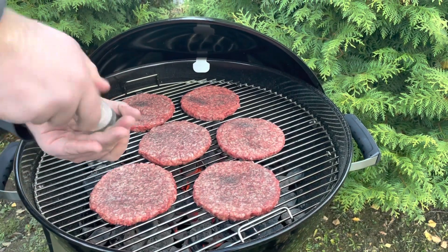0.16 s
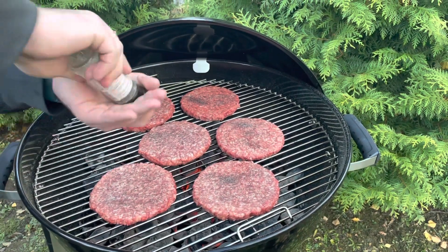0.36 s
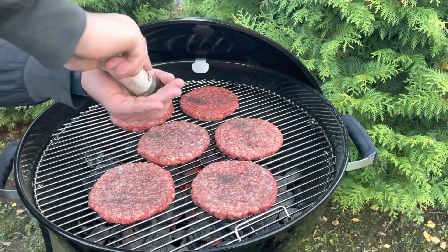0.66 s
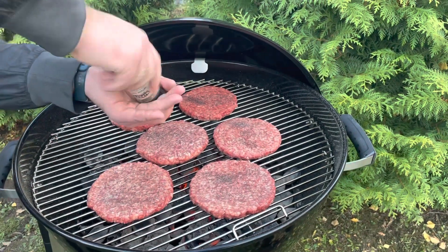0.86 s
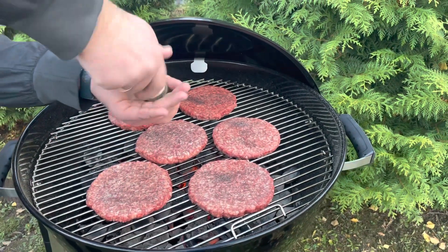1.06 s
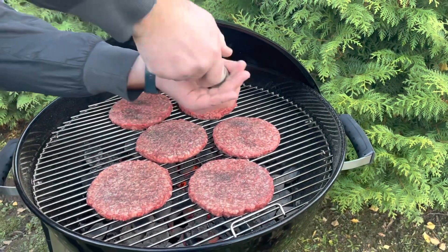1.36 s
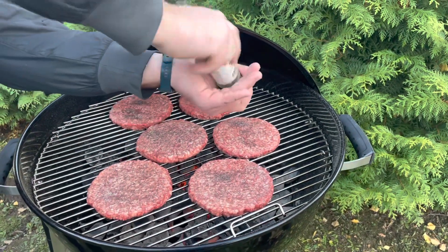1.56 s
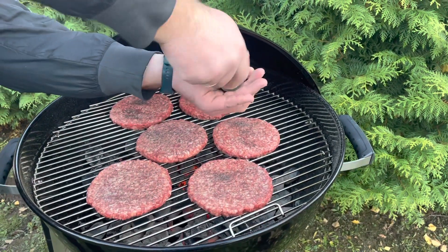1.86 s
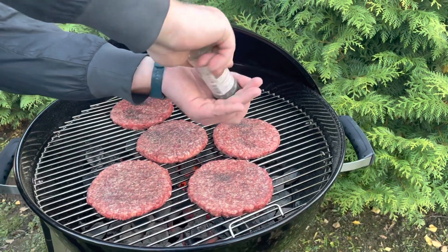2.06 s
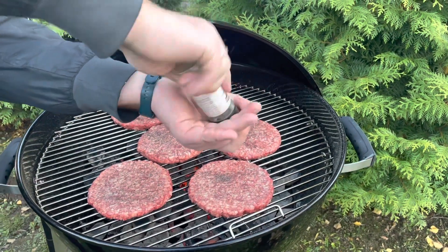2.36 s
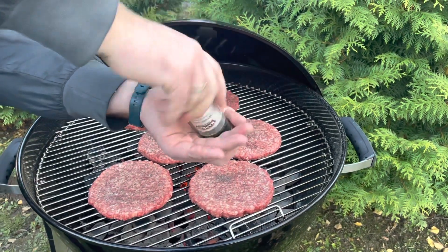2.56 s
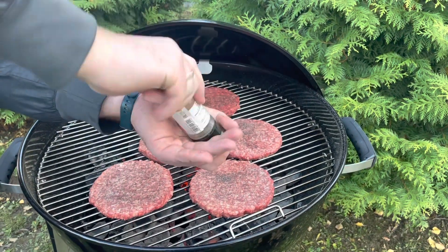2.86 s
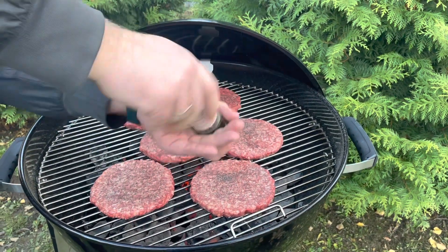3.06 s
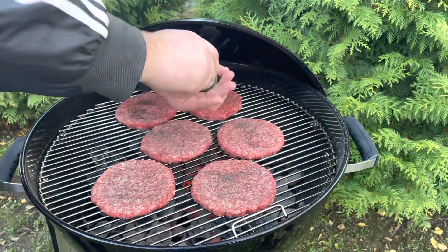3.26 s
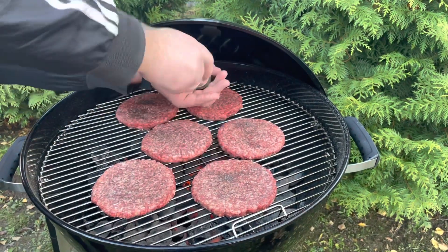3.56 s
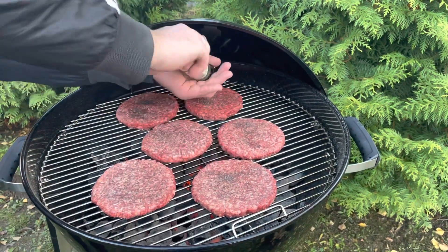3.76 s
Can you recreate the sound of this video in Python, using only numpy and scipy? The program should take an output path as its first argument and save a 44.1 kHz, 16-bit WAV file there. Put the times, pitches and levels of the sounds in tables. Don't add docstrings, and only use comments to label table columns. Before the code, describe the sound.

A hand pepper mill grinds very close, in fourteen short crunchy twists starting near 0.1 s and recurring roughly every 0.3 s until 3.9 s. Each lasts about a tenth of a second, with bright snapping cracks and small hollow jar ringing; strokes around 1.3-1.8 s are somewhat softer. Sparse ticks fill the gaps. Faint grill sizzle and low distant traffic continue outdoors; the stereo phone clips on the loudest cracks.

```python
import sys
import numpy as np
from scipy import signal
from scipy.fft import rfft, irfft
from scipy.io import wavfile
from scipy.ndimage import uniform_filter1d

SR = 44100
rng = np.random.default_rng(int(sys.argv[2]) if len(sys.argv) > 2 else 0)


def ratio(d):
    e = np.asarray(d, float) / 20
    return 10 ** e


def waveform_to_disk(signal):
    frames = np.transpose(np.atleast_2d(signal))
    scaled = np.clip(frames, -1, 1) * 32767
    samples = np.round(scaled).astype(np.int16)
    wavfile.write(sys.argv[1], SR, samples)


N = 171990
HZ = np.fft.rfftfreq(N, 1 / SR) + 1e-3

# frequency in Hz, level in dB.
TRAFFIC_COLOUR = [(36, -22), (52, 8), (80, -5.5), (150, -11), (300, -18.5), (1000, -18), (3000, -13.5),
                  (7000, -36)]
# frequency in Hz, level in dB.
SIZZLE_COLOUR = [(300, -52), (800, -16), (1600, -5), (3500, -7.5), (6000, -6.5), (8500, 1), (13500, 1),
                 (15500, -7.5)]
# start in seconds, length in seconds, crunch level in dB,
# treble over bass in dB, thud in the hand in dB.
TWISTS = [(0.105, 0.074, -13.5, -2, -17), (0.418, 0.084, -11, -9, -15.5), (0.698, 0.083, -9.5, -4, -21),
          (0.953, 0.097, -11.5, -4.5, -18), (1.274, 0.11, -19, -10.5, -16.5), (1.557, 0.1, -16.5, -7, -19),
          (1.804, 0.11, -16, -11, -19), (2.105, 0.11, -12, -7.5, -17), (2.388, 0.09, -12, -12, -25),
          (2.657, 0.065, -12, -12.5, -24.5), (2.896, 0.1, -14, -1.5, -25),
          (3.229, 0.13, -13.5, -5.5, -23.5), (3.537, 0.11, -12.5, -5.5, -22.5),
          (3.8, 0.092, -13.5, -6.5, -19.5)]
# time in seconds, level in dB, treble over bass in dB.
CRACKS = [(0.131, -13, 15), (0.1424, -3.5, -5), (0.144, 2, -10), (0.1879, 6, -5), (0.1947, -14, 17),
          (0.436, -5, 18), (0.458, -3.5, 18), (0.4714, -15, -11), (0.4939, -3.5, 12),
          (0.7086, -5.5, 13), (0.7147, -4, 19), (0.7333, -7, 5), (0.741, -8, -3), (0.751, 4.5, 4),
          (0.7603, 2.5, 9), (0.9667, -8.5, 7), (0.9717, -10, 13), (0.99, -9, 9), (1.0315, -5.5, 12),
          (1.2835, -0.5, 7.5), (1.339, -8, 14), (1.5584, -11.5, -0.5), (1.572, -14, 13),
          (1.5816, 0, 17), (1.5933, -4.5, 14), (1.6077, 1, 8.5), (1.8094, -16.5, 2),
          (1.827, -9.5, 12), (1.84, -4.5, 14), (1.8547, -9, 30.5), (2.101, -16.5, 9),
                 (2.1215, 2.5, 6), (2.13, 0, -14.5), (2.1374, -0.5, 0), (2.1734, 5, -0.5), (2.1907, -3, 11),
                 (2.245, -17.5, 9), (2.3787, -10, -10.5), (2.3947, -1.5, 5), (2.3993, -5, 3),
                 (2.408, 1.5, 8), (2.4164, 3.5, -3), (2.4326, 4.5, -6), (2.454, -6, 14), (2.46, -5, 19),
                 (2.4647, 4, 7), (2.6317, -19, 15), (2.6601, -4, 4), (2.67, 3.5, -2.5), (2.6751, -0.5, 18),
                 (2.679, -10, 9), (2.6847, -6, 7), (2.6929, 0.5, -5.5),
          (2.7013, -2, 15), (2.725, -14.5, -22.5), (2.9024, -12.5, 4), (2.9092, -8, 4),
               (2.9167, 1, 14), (2.9266, 1.5, 15), (2.9452, 0.5, -2), (2.964, -3.5, -2), (2.972, -6.5, 6),
               (3.042, -20, 5), (3.2434, -7.5, 24), (3.2592, -1, 10.5), (3.2929, -7, -15), (3.328, -16, 8),
               (3.3486, -6, 26.5), (3.5362, -5.5, -3.5), (3.5552, -1, 20), (3.5823, -2.5, 21),
               (3.595, -1, 8), (3.5973, 4, 20), (3.6273, -5.5, 1), (3.8004, -14.5, -1),
               (3.8166, -3.5, 17.5), (3.8324, -20, 10), (3.8861, 1, 19),
          (0.1277, -6, 4), (0.153, -2, 8), (0.1597, -9, 3), (0.1647, -5, 0), (.1725, -8, -6),
                (0.4515, -8, 6), (0.479, -8.5, -7), (0.7405, 10, 3), (1.021, -9.5, -6), (1.3175, -20, 14),
                (1.325, -15, 5), (1.331, -11, 10), (1.354, -20, 9), (1.6044, -11, 18), (1.617, -8, -1),
                (1.8633, -9, 8), (1.872, -10.5, -16), (1.883, -16, -2), (2.1856, -2.5, 11),
                (3.2766, -11, -1), (3.33, -14, 17), (3.3584, -15, 6), (3.564, -9.5, 9), (3.8343, -10.5, 0),
                (3.8462, -12, 5)]
# time in seconds, level in dB.
TICKS = [(0.394, -27), (0.4188, -17), (0.684, -28), (0.836, -17), (1.09, -17.5), (1.1352, -24),
         (2.002, -21.5), (2.0364, -25.5), (2.0654, -24.5), (2.0777, -23), (2.6173, -27), (3.5077, -21.5),
         (3.514, -30), (3.674, -22), (3.7572, -23.5)]
# top edge in Hz, rise in seconds, decay in seconds,
# share of the treble tilt (no unit).
CRACK_BANDS = [(733, 0.006, 0.0074, -0.48), (2700, 0.00042, 0.0046, -0.53), (5840, 0.00034, 0.0028, -0.065),
               (11100, 0.00031, 0.0024, 0.15), (19400, 0.00067, 0.0035, 0.44)]
# frequency in Hz, level in dB.
MILL_COLOUR = [(100, -35), (330, -34.5), (700, -21), (1700, -7.5), (3500, -12), (5600, -9), (8000, 6),
               (11000, -3.5), (15000, -9.5)]
# frequency in Hz, time to fall 60 dB in seconds, level in dB.
JAR_MODES = [(239, 0.037, 11), (530, 0.052, -7), (1570, 0.041, 5.5), (2403, 0.004, -3.5),
             (3880, 0.0032, -0.5), (6435, 0.02, 1), (7710, 0.026, -12.5), (13470, 0.009, 4.5)]
# start in seconds, frequency in Hz,
# time to fall 60 dB in seconds, level in dB.
GRIP_MODES = [(.11, 507, 0.02, 7), (.11, 3230, 0.0065, 6), (.42, 746, 0.03, 2.5), (.7, 217, 0.064, 8.5),
              (.7, 2030, 0.026, -13), (.95, 980, 0.018, 1.5), (1.275, 1114, 0.035, 2),
              (1.275, 2510, 0.035, -0.5), (1.275, 6200, 0.0091, 3.5), (1.555, 1547, 0.086, 3),
              (1.555, 2454, 0.013, -2.5), (1.805, 1860, 0.0048, -6), (2.11, 1710, 0.037, 3),
              (2.375, 1350, 0.051, -3), (2.655, 1200, .04, 10), (2.655, 2454, 0.026, -8),
              (3.53, 5426, 0.023, -10), (3.799, 224, 0.037, 8)]
# frequency in Hz, phase in radians.
PORT_LEAD = [(1400, .42), (2300, 1.2), (2850, 3), (3150, 3.4), (3900, 6.1), (5300, 7), (6200, 5),
             (7800, 3.15), (9700, 3.12), (12800, 0)]
# frequency in Hz, likeness from 0 to 1.
PORT_LIKENESS = [(300, .93), (1500, .95), (3000, .9), (4500, .84), (5900, .35), (7900, .93), (8900, .997),
                 (9700, .92), (11000, .65), (12600, .98)]
# frequency in Hz, level in dB.
PORT_BALANCE = [(300, 3), (1000, 4), (2400, -3), (3500, 1), (5200, 4), (6900, 3.5), (7900, 0)]


def curve(points):
    hz, value = np.array(points, float).T
    return np.interp(np.log(HZ), np.log(np.maximum(hz, 1)), value)


def minimum_phase(db):
    cepstrum = irfft(np.log(ratio(db)), N)
    cepstrum[1:N // 2] *= 2
    cepstrum[N // 2 + 1:] = 0
    return np.exp(rfft(cepstrum))


def walk(rate_hz):
    hold = int(SR / rate_hz)
    steps = np.repeat(rng.standard_normal(N // hold + 1), hold)
    return 0.85 * uniform_filter1d(uniform_filter1d(steps, hold), hold)[:N]


def random_events(count, per_s):
    gap, chance = rng.random((count, 2)).T
    return np.cumsum(-np.log(1 - gap)) / per_s, chance


def bursts(times, db, rise_s, decay_s):
    places = np.clip((times * SR).astype(int), 0, N - 1)
    power = np.bincount(places, ratio(2 * db), N)
    for s in (rise_s, decay_s):
        power = signal.lfilter([1], [1, -np.exp(-2 / (s * SR))], power)
    return np.sqrt(power * 2 / (rise_s * SR))


def ports(spectra, focus):
    likeness = np.clip(curve(PORT_LIKENESS), 0, 1)
    apart = np.minimum((2 - 2 * likeness) ** focus / 2, 1)
    both = np.sqrt(1 - apart) * spectra[0] + np.sqrt(apart) * spectra[1:]
    left = ratio(curve(PORT_BALANCE) / 2) * np.exp(0.5j * curve(PORT_LEAD))
    return irfft(both * np.array([left, 1 / left]), N)


def traffic():
    level_db, likeness = -48.5, 0.45
    lull_s, lull_width_s, lull_depth_db = 3.186, 0.17, -11
    lull_db = lull_depth_db * np.exp(-((np.arange(N) / SR - lull_s) / lull_width_s) ** 2)
    noise = ratio(1.1 * walk(4) + lull_db) * rng.standard_normal((3, N))
    both = np.sqrt(likeness) * noise[0] + np.sqrt(1 - likeness) * noise[1:]
    low_cut = np.minimum(HZ / 25, 1) ** 3
    x = irfft(rfft(both) * ratio(curve(TRAFFIC_COLOUR)) * low_cut, N)
    return x * ratio(level_db) / np.std(x)


def sizzle():
    level_db, pop_spread_db = -33, 1.5
    times, chance = random_events(16000, per_s=2300)
    pop_db = -pop_spread_db * np.log(1 - chance)
    pops = bursts(times, pop_db, rise_s=0.000072, decay_s=0.0072)
    swell_db = walk(1.925)
    spectra = 0
    for centre_hz in 300 * 2.0 ** np.arange(7):
        octaves = np.clip(np.log2(HZ / centre_hz), -1, 1)
        band = np.clip(np.cos(np.pi / 2 * octaves), 0, 1)
        flicker = ratio(swell_db + 0.85 * walk(27.07))
        spectra = spectra + band * rfft(pops * flicker * rng.standard_normal((3, N)))
    x = ports(spectra * ratio(curve(SIZZLE_COLOUR)), focus=2.2)
    return x * ratio(level_db) / np.std(x)


def spits():
    times, chance = random_events(300, per_s=21)
    db = -36.5 - 2.5 * np.log(1 - chance)
    rows = np.c_[times, db, np.full(300, 6.0)]
    return rows[times < N / SR]


def crunch():
    level_db, spread_db = -6.5, 2.5
    twist_rise_s, twist_fall_s = 0.022, 0.046
    times, chance = random_events(9000, per_s=650)
    db, tilt = np.full(9000, -120.0), np.zeros(9000)
    for start, length, twist_db, tilt_db, _ in TWISTS:
        rise = np.clip((times - start) / twist_rise_s, 0, 1) ** 2
        fall = np.clip((start + length - times) / twist_fall_s, 0, 1)
        force = rise * fall
        on = force > 0
        db[on] = twist_db + 20 * np.log10(force[on])
        tilt[on] = tilt_db
    db += level_db - spread_db * np.log(1 - 0.93 * chance)
    return np.c_[times, db, tilt]


def big_cracks():
    level_db, usual_tilt_db, tick_tilt_db = -4.5, 6, 9.5
    ticks = [(s, db, tick_tilt_db) for s, db in TICKS]
    rows = np.array(CRACKS + ticks)
    return rows + [0, level_db, -usual_tilt_db]


def grip(x):
    n = int(0.13 * SR)
    out = x.copy()
    for start, hz, t60, db in GRIP_MODES:
        i = int(start * SR)
        pole = np.exp(2j * np.pi * hz / SR - np.log(1000) / (t60 * SR))
        part = x[:, i:i + 2 * n] * (np.arange(2 * n) < n)[:N - i]
        ringing = signal.lfilter([1], [1, -pole], part).real
        out[:, i:i + 2 * n] += 2 * ratio(db) * (1 - abs(pole)) * ringing
    return out


def palm(x):
    delay_s, drift, echo_db = 0.00035, 0.45, -5.5
    late = np.clip(delay_s * SR * np.exp(drift * walk(18)), 1, 100).astype(int)
    return x + ratio(echo_db) * x[:, np.maximum(np.arange(N) - late, 0)]


def jar():
    response = 1
    for hz, t60, db in JAR_MODES:
        response = response + ratio(db) / (1 + 2j * np.pi * (HZ - hz) * t60 / np.log(1000))
    return response


def mill():
    colour_spread_db, thud_db, patchy_db = 5, 22, 1.7
    snap_db, snap_share, click_db = 2.5, 0.14, 11.5
    big = big_cracks()
    small = np.r_[crunch(), spits()]
    count, big_times = len(big), big[:, 0]
    times, db, tilt = np.r_[big, small].T
    big_scatter, small_scatter = colour_spread_db * rng.standard_normal((2, 9400, len(CRACK_BANDS)))
    scatter = np.r_[0.3 * big_scatter[:count], small_scatter[:len(small)]]
    start, length, _, _, hand_db = np.array(TWISTS).T
    scatter[:, 0] += np.interp(times, start + length / 2, hand_db) + thud_db
    spectra, below = 0, 0
    for k, (top_hz, rise_s, decay_s, share) in enumerate(CRACK_BANDS):
        band_db = db + share * tilt + scatter[:, k]
        big_db = band_db[:count]
        rustle = bursts(times, band_db, rise_s, decay_s)
        snap = bursts(big_times, big_db + snap_db, rise_s / 2, decay_s * snap_share)
        env = np.hypot(rustle, snap) * ratio(patchy_db * walk(29.974))
        sound = env * rng.standard_normal((3, N))
        if k > 0:
            sound += np.bincount((big_times * SR).astype(int) + 8, ratio(big_db + click_db), N)
        low = 1 / (1 + (HZ / top_hz) ** 6)
        spectra = spectra + np.sqrt(np.maximum(low - below, 0)) * rfft(sound)
        below = low
    struck = irfft(spectra * minimum_phase(curve(MILL_COLOUR)) * jar() * ratio(3), N)
    return ports(rfft(palm(grip(struck))), focus=0.8)


def scene():
    return mill() + sizzle() + traffic()


def low_pass(x):
    return signal.sosfilt(signal.butter(12, 15840, fs=SR, output="sos"), x)


def record(dry):
    top_cut = signal.ellip(8, 0.2, 60, 15800, fs=SR, output="sos")
    x = signal.sosfilt(top_cut, dry)
    drive_db = 0.23
    return low_pass(np.clip(x * ratio(drive_db), -1, 1))


dry = scene()
out = record(dry)
waveform_to_disk(out)
```